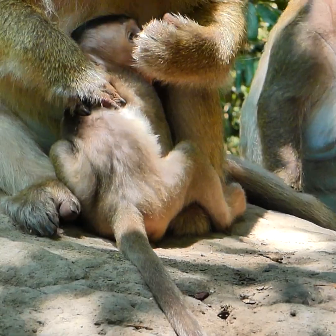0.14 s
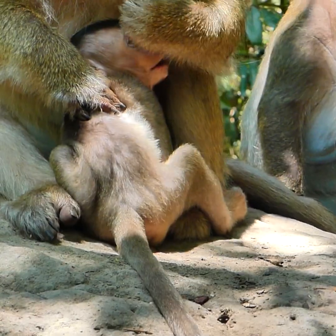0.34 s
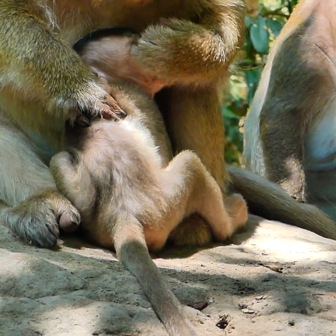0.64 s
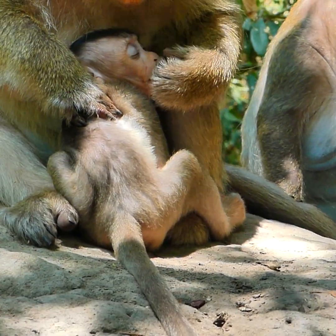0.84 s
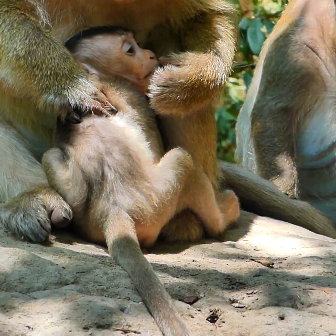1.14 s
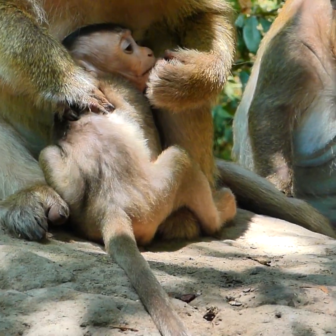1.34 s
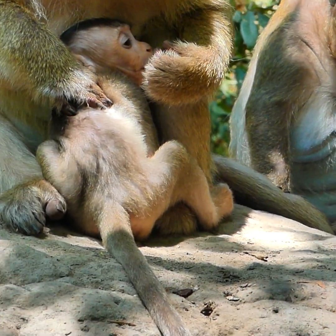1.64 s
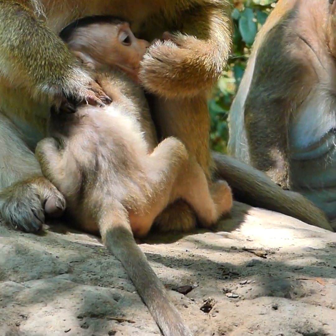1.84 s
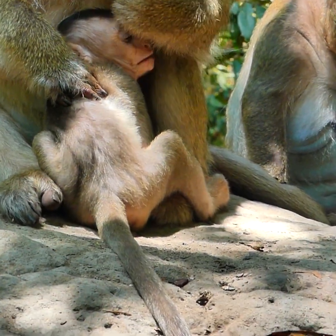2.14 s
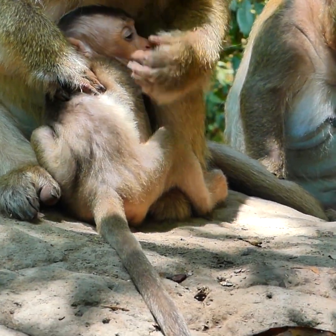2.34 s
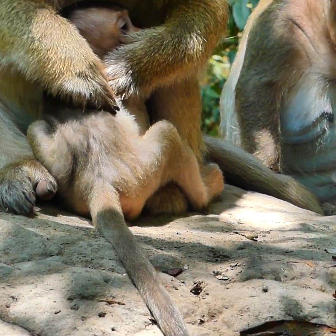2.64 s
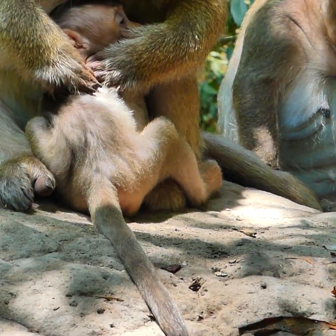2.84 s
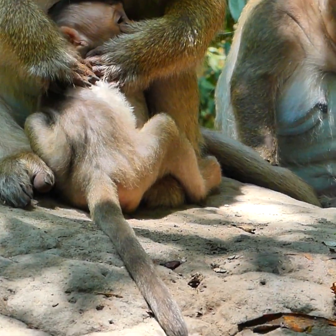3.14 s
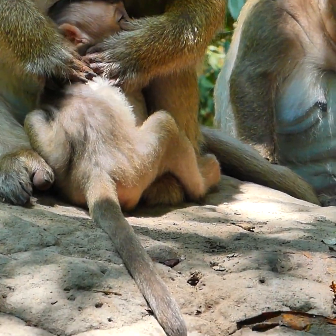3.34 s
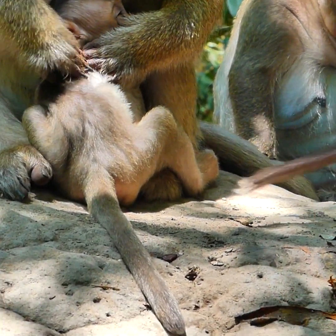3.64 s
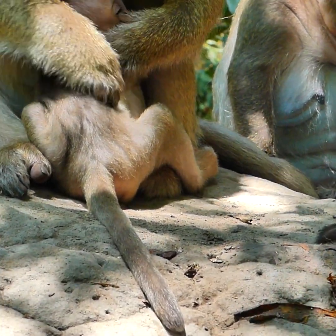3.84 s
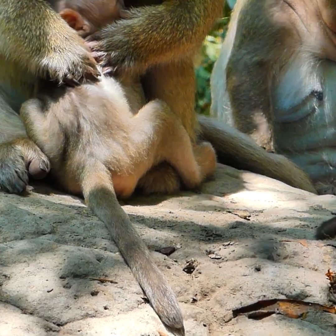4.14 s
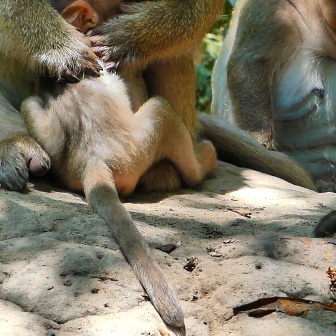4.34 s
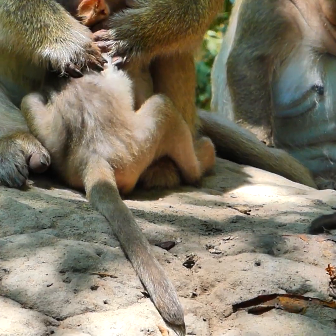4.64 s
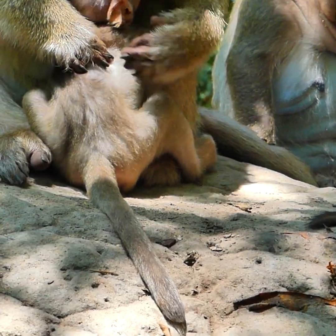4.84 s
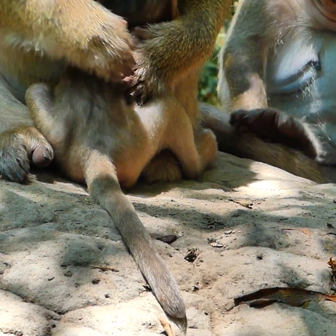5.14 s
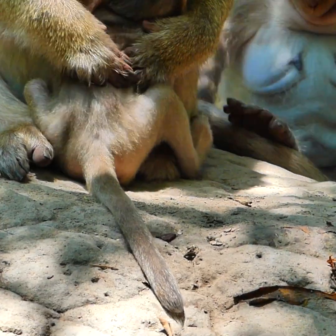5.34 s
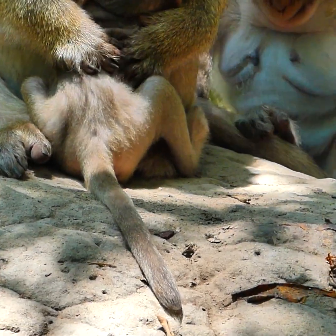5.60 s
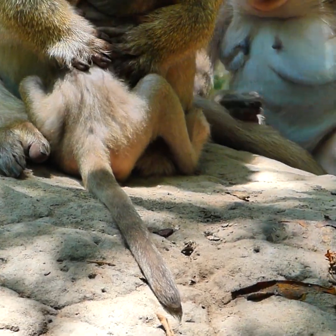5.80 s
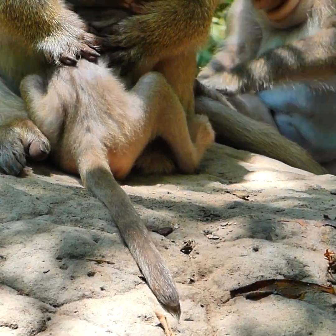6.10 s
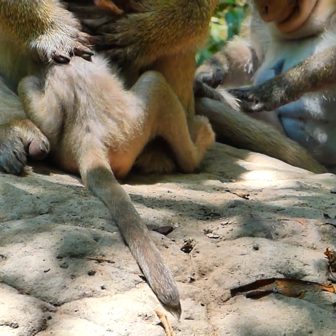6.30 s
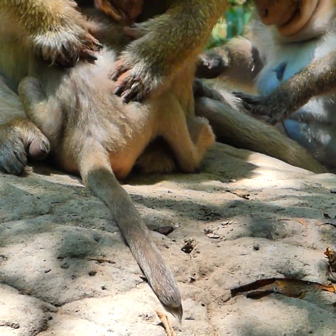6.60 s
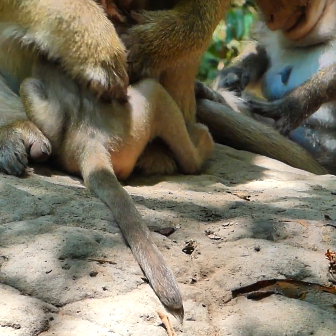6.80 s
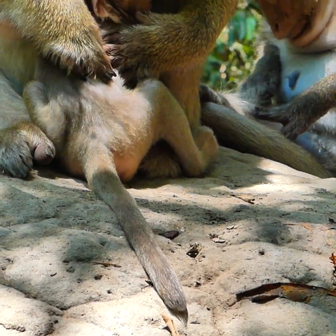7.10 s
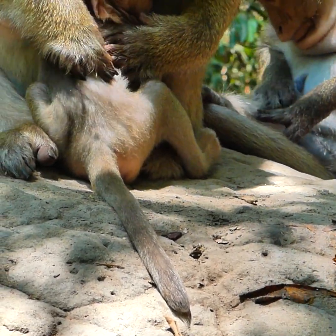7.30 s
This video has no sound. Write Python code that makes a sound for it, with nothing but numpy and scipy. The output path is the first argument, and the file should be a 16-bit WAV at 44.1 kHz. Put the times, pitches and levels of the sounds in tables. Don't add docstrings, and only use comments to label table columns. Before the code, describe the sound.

Soft, falling monkey coos turn to shrill cries in a breezy forest, while cicadas buzz, birds chip in pairs and leaves crackle.

```python
import sys
import numpy as np
from scipy import signal
from scipy.io import wavfile
from scipy.ndimage import uniform_filter1d

SR = 44100
rng = np.random.default_rng(int(sys.argv[2]) if len(sys.argv) > 2 else 0)


def waveform_to_disk(signal):
    frames = np.transpose(np.atleast_2d(signal))
    scaled = np.clip(frames, -1, 1) * 32767
    samples = np.round(scaled).astype(np.int16)
    wavfile.write(sys.argv[1], SR, samples)


def rack_gain(trim_db):
    fader = np.asarray(trim_db, float)
    return 10 ** (fader / 20)


N = 328986
T = np.arange(N) / SR


def evened(x):
    return x / np.sqrt(np.mean(x ** 2) + 1e-20)


def drift(shape, samples):
    return evened(uniform_filter1d(rng.standard_normal(shape), samples))


def smooth_drift(shape, samples):
    once = uniform_filter1d(rng.standard_normal(shape), samples)
    return evened(uniform_filter1d(once, samples))


def spectral_patches(frames, bins, over_bins, over_frames):
    across = uniform_filter1d(rng.standard_normal((frames, bins)).T, over_bins, 0)
    return evened(uniform_filter1d(across, over_frames, 1))


def read(points, hz):
    f, value = np.transpose(points)
    return np.interp(np.log(hz + 1), np.log(f + 1), value)


def curves(rows, fade_s=0.0033):
    s, *columns = np.transpose(rows)
    window = np.clip(np.minimum(T - s[0], s[-1] - T) / fade_s, 0, 1)
    return [np.interp(T, s, c) for c in columns], window


def resonate(x, hz, width_hz):
    turn = np.exp(2j * np.pi * np.cumsum(hz * np.ones(N)) / SR)
    r = np.exp(-np.pi * width_hz / SR)
    return 2 * (turn * signal.lfilter([(1 - r) ** 2], [1, -2 * r, r * r], x / turn)).real


def noise(db, same, lean_db, size=512):
    a, b, c, d = rng.standard_normal((db.shape[1], db.shape[0], 4)).T
    left, right = rack_gain(lean_db / 2), rack_gain(-lean_db / 2)
    shared, own = a + 1j * b, c + 1j * d
    z = np.array([left * shared, right * (same * shared + np.sqrt(1 - same ** 2) * own)])
    z *= rack_gain(db) * 2 / np.sqrt(left ** 2 + right ** 2 + 2 * same * left * right)
    return signal.istft(z, nperseg=size, noverlap=3 * size // 4)[1][:, :N]


def forest(x, t60_s):
    t = np.arange(SR // 2) / SR
    signs = rng.choice([-1., 1.], (2, len(t)))
    taps = signs * (rng.random((2, len(t))) < .06) * rack_gain(-60 * t / t60_s) * (t > .004)
    return signal.fftconvolve(x[None], taps / np.linalg.norm(taps[0]), axes=1)[:, :N]


def air():
    # (f/Hz, density/dB)
    air_points = [(15, -76), (25, -50), (123, 4), (242, -8.5), (363, -15), (405, -12.5), (531, -16),
                  (575, -17), (1610, -26), (1840, -24.5), (3300, -29), (4300, -29.5), (5730, -22.5),
                  (6560, -25), (7550, -27), (9500, -24), (11000, -24.5), (12500, -30.5), (16000, -30.5)]
    # (f/Hz, correlation)
    same_points = [(60, -0.24), (130, -0.086), (290, -0.84), (640, -0.72), (1410, -0.54), (3100, 0.018),
                   (6820, 0.25), (15000, 0.24)]
    # (f/Hz, level/dB)
    lean_points = [(60, -43), (180, -2.5), (550, -1.5), (1650, -1), (4970, -1.5), (15000, 1)]
    hz = np.fft.rfftfreq(1024, 1 / SR)[:, None]
    patches_db = 1.6 * spectral_patches(N // 256 + 5, 513, 10, 12)
    same = np.clip(read(same_points, hz), -.9, .9)
    x = noise(read(air_points, hz) + patches_db, same, read(lean_points, hz), size=1024)
    return rack_gain(-60) * x / np.std(x.mean(0))


def chorus():
    # (f/Hz, width/Hz, level/dB)
    insect_bands = [(5654, 590, -70), (8560, 670, -73.5), (10840, 470, -78.5)]
    near, apart = rng.standard_normal(N), rng.standard_normal((2, N))
    return sum(rack_gain(db) * evened(resonate(near + 0.2 * apart, hz, width_hz))
               for hz, width_hz, db in insect_bands)


def cicada(swell, throb, hz, width_hz, rise_hz, clicks_hz, depth_db, blur):
    start, end, full_db, below_db, swell_s = swell
    first_turn, throbs_hz, tires_s = throb
    skirt_hz, skirt_db = 340, -5
    db = full_db - below_db * np.exp(-(T - start).clip(0) / swell_s)
    gate = np.clip(np.minimum(T - start, end - T) / .15, 0, 1)
    tiring = .6 * (T - tires_s).clip(0) ** 2
    turn = 2 * np.pi * (first_turn + throbs_hz * T - tiring)
    count = np.cumsum(clicks_hz * (1 + 0.018 * drift(N, 900))) / SR
    clicks = sum(size * np.diff(np.floor(count + at), prepend=0).clip(0, 1)
                 for at, size in [(0, 1), (.31, .8), (.63, 1)])
    drive = evened(clicks) + blur * rng.standard_normal(N)
    skirt = rack_gain(skirt_db - np.interp(T, [2.85, 3.1], [0, 18]))
    belly = resonate(drive, hz + rise_hz * np.sin(turn), width_hz)
    buzz = evened(belly + skirt * resonate(drive, hz - skirt_hz, width_hz))
    depth_db = depth_db * np.interp(T, [2.8, 3.1], [.8, 1])
    x = rack_gain(db + depth_db * (np.cos(turn) - .2 * np.cos(2 * turn))) * gate * buzz
    return x + rack_gain(-11.5) * forest(x, 0.16)


def bird(chips, pitch, echo_db):
    # (start/ms, length/ms, from/Hz, to/Hz, level/dB)
    trill = [
        (-.4, 5.4, 5000, 7800, 1),
        (5, 6, 4700, 7400, 1.5),
        (10.8, 5, 7800, 5300, 5),
        (15.4, 4.4, 6000, 7300, 2.5),
        (18.4, 4, 7150, 7450, 4),
        (19.6, 3.4, 8000, 9200, -9),
    ]
    glide_ms, rise_ms, fade_db_per_ms = .65, 1.1, 2.6
    out, t_ms = np.zeros(N + SR), np.arange(-1, 26, 1000 / SR)
    for (s, peak_db), (tune, pace) in zip(chips, rng.standard_normal((len(chips), 2))):
        early = s < 5
        at_ms = t_ms * (1 + .02 * pace + .1 * early)
        start = round((s - .001) * SR)
        for ms, length_ms, from_hz, to_hz, db in trill:
            u = (at_ms - ms).clip(0)
            slide_ms = glide_ms * (1 if to_hz > from_hz else 4)
            hz = (to_hz + (from_hz - to_hz) * np.exp(-u / slide_ms)) * pitch * (1 + 0.0173 * tune)
            phase = 2 * np.pi * np.cumsum(hz) / SR
            shy_db = -1.5 * early * (ms < 8)
            fade = np.clip(np.minimum(u, length_ms - u) / rise_ms, 0, 1)
            envelope = rack_gain(peak_db + db + shy_db - fade_db_per_ms * u) * fade
            grit = rack_gain(2.5 * drift(len(t_ms), 25))
            note = np.sin(phase) + rack_gain(-23.5) * np.sin(2 * phase)
            out[start:start + len(t_ms)] += envelope * grit * note
    return out[:N] + rack_gain(echo_db) * forest(out[:N], 0.15)


def rustle():
    # (peak t/s, level near 3.5 kHz/dB, rise per 20 dB/s, t60/s, brightness/dB)
    moves = [(0.137, -62, 0.011, 0.37, -12), (.76, -70, 0.22, 1.5, -37), (1.008, -64.5, .008, 0.29, -43),
             (1.106, -56.5, .008, 0.57, -25), (1.275, -59, .008, 0.051, -41),
             (.375, -66.5, 0.011, 0.39, -14), (.465, -68.5, 0.011, 0.17, -30),
             (.555, -67.5, .01, 0.36, -25), (1.6, -74, 0.44, 3.5, -13), (1.95, -68.5, .1, .5, -28),
             (3.6, -68, .01, 0.22, -18), (3.75, -68.5, .01, 0.49, -18), (3.9, -70, .03, 0.37, -10),
             (5.95, -68, 0.031, 0.3, -41), (6.3, -69, .03, 0.61, -28), (6.82, -54.5, .05, .8, -25),
             (7.0, -54, 0.048, .8, -11), (4.3, -67.5, 0.055, 0.94, -27), (4.503, -63.5, 0.02, 0.68, -6),
             (4.69, -66, .05, 1.3, -29), (4.791, -69.5, 0.086, 0.29, -10), (5.04, -70, 0.038, 0.4, 10),
             (6.517, -55, 0.008, 0.66, -15), (6.559, -59, 0.081, 1.1, -14.5),
             (6.666, -58.5, 0.031, 0.61, -8), (6.73, -50.5, 0.031, 1.3, -23), (6.784, -56, 0.14, 0.45, -13),
             (6.86, -52.5, 0.14, 1.26, -25), (6.95, -53, 0.2, 0.64, -7), (7.06, -60.5, 0.11, 0.98, -2),
             (7.127, -43.5, 0.072, 0.16, -15.5), (7.15, -48.5, .05, 0.3, -20)]
    t = np.arange(N // 64 + 5) * 64 / SR
    hz = np.fft.rfftfreq(256, 1 / SR)[:, None]
    common_db = read([(300, -59), (700, -4.0), (3000, 0.5), (4000, 3.0), (5200, 1), (6500, 9.5),
                      (11500, 4.5), (12500, -71), (16000, -30)], hz)
    body = read([(1900, 0.72), (3300, 0.16)], hz)
    bright = read([(4500, 0.017), (10500, 0.45)], hz)
    presence = read([(4500, 0.013), (6300, 0.8), (10500, 0.03)], hz)
    field = np.full((129, len(t)), -140.)
    for s, db, rise_s, t60_s, treble_db in moves:
        shape_db = common_db - 12 * body + bright * treble_db + presence * (1.5 + 0.16 * treble_db)
        fall_db = np.where(t < s, 20 * (s - t) / rise_s, 60 * (t - s) / t60_s)
        field = np.maximum(db + shape_db - fall_db, field)
    flicker_db = 2.8 * rng.standard_normal(len(t))
    patches_db = 2.5 * spectral_patches(len(t), 129, 5, 14)
    return rack_gain(-11.5) * noise(field + flicker_db + patches_db, 0.033, -0.86, size=256)


def ticks():
    # (t/s, level/dB, ring f/Hz, width/Hz)
    leaf_ticks = [
        (3.4287, -49.5, 5600, 2200),
        (3.4886, -57, 4630, 900),
        (3.491, -52.5, 2310, 500),
        (6.932, -38, 8030, 4000),
        (7.107, -34, 6030, 5000),
        (7.1239, -32, 3940, 2587),
        (1.1065, -43, 4360, 1400),
    ]
    t60_s = 0.027
    out, t = np.zeros((2, N)), np.arange(0, .06, 1 / SR)
    for s, db, hz, width_hz in leaf_ticks:
        ring = signal.butter(2, [max(hz - width_hz / 2, 200), hz + width_hz / 2], "bandpass", fs=SR)
        puff = rng.standard_normal(len(t)) + 2.5 * rng.standard_normal((2, len(t)))
        crack = rack_gain(db - 60 * t / t60_s) * evened(signal.lfilter(*ring, puff))
        out[:, round(s * SR):][:, :len(t)] += crack
    return out


def twig():
    # (t/s, peak/dB)
    snap_s, snap_db = (6.4885, -28)
    # (f/Hz, level/dB, t60/s)
    twig_modes = [(2695, -23, .02), (4130, 3.5, 0.016), (5230, -7, 0.034), (6780, 0.5, 0.016),
                  (8000, -3, 0.021), (9500, -5.5, 0.013), (11500, -11, .01)]
    t = (T - snap_s).clip(0)
    modes = sum(rack_gain(db - 60 * t / t60_s) * np.sin(2 * np.pi * hz * t) for hz, db, t60_s in twig_modes)
    crack = modes * np.clip(t / 0.0009, 0, 1)
    crack = rack_gain(snap_db) * (crack + 0.29 * np.roll(crack, 240))
    return crack + rack_gain(-4.0) * forest(crack, 0.11)


def bumps():
    # (t/s, level/dB, ring f/Hz, width/Hz, t60/s)
    ringing_puffs = [(1.11, -56.5, 317, 150, 0.36), (1.32, -54.5, 169.7, 152, 0.27),
                     (1.33, -55.5, 430, 295, 0.37), (1.416, -56.5, 610, 130, 0.21),
                     (1.47, -54.5, 670, 202.4, 0.13), (3.881, -52.5, 570, 785, 0.51),
                     (.53, -67, 1730, 260, 1.2), (4.507, -56, 670, 150, .13), (4.603, -57, 820, 250, .07),
                     (4.685, -63, 650, 250, 1.3), (4.762, -59, 770, 450, .3), (4.79, -59, 790, 420, .3),
                     (4.735, -67, 1450, 500, .6), (4.499, -56.5, 2400, 2800, .5), (4.5, -62, 4300, 400, .3),
                     (4.5, -61, 3300, 500, .3), (4.52, -67, 2450, 500, .8), (4.79, -67, 4400, 500, .8),
                     (5.06, -60, 1700, 1100, .4), (5.085, -58, 2000, 1200, .22), (5.04, -64, 930, 400, .55),
                     (1.862, -59, 930, 480, .3), (1.915, -66, 1290, 130, .4), (1.905, -67, 1860, 250, .3),
                     (2.88, -65, 2100, 1400, .6), (3.325, -60.5, 2570, 500, 0.16), (6.85, -57, 1400, 250, .15),
                     (.2, -60, 2100, 500, .4), (.25, -63, 2500, 200, .15), (1.108, -61, 1520, 330, .7),
                     (1.262, -65, 1500, 500, .25), (1.33, -65, 1500, 900, .6), (6.72, -60, 1350, 300, .5),
                     (1.105, -57, 4400, 1500, .55), (1.105, -63, 2500, 500, .4), (.648, -58, 1200, 320, .4),
                     (.742, -61, 1170, 220, .4), (.745, -62, 2200, 220, .4), (.92, -61, 1750, 650, .8),
                     (1.012, -58, 1300, 260, .2)]
    # (t/s, peak/dB, f/Hz, length/s)
    knocks = [
        (4.4963, -47, 676, 0.023),
        (4.7505, -46, 770, 0.0096),
    ]
    out = np.zeros((2, N))
    puff = rng.standard_normal(N) + 2.2 * rng.standard_normal((2, N))
    for s, db, hz, width_hz, t60_s in ringing_puffs:
        t = (T - s).clip(0)
        envelope = rack_gain(db - 60 * t / t60_s) * np.clip(t / 0.0015, 0, 1)
        out += envelope * evened(resonate(puff, hz, width_hz))
    for s, db, hz, length_s in knocks:
        u = np.clip((T - s) / length_s, 0, 1)
        out += rack_gain(db) * np.sin(np.pi * u ** 0.44) * np.sin(2 * np.pi * hz * (T - s))
    return out


def panting():
    # (t/s, level/dB, mouth opening 0-1)
    breath_rows = [
        (0.635, -75, 0),
        (0.65, -61, 0),
        (0.72, -64.5, 0.18),
        (.8, -66.5, 0.22),
        (0.86, -65, 0.26),
        (0.96, -59.5, 0.66),
        (1.04, -62.5, 0.62),
        (1.116, -65, 0.85),
        (1.22, -78, 1),
    ]
    # (f/Hz, width/Hz, shift at full opening/Hz)
    throat_rings = [(1207, 260, 170), (1864, 300, -350), (2245, 290, -420), (2740, 290, 20)]
    # (t/s, lift/dB)
    gasps = [
        (.648, 3),
        (0.743, 9),
        (.795, 2.5),
        (.925, 1),
        (.965, 0),
        (1.012, 6),
        (1.075, 2.5),
        (1.108, -2),
    ]
    gasp_fade_s = 0.026
    (db, mouth), gate = curves(breath_rows)
    for s, lift_db in gasps:
        db = db + lift_db * np.exp(-(T - s).clip(0) / gasp_fade_s) * np.clip((T - s) / .003, 0, 1)
    turns = np.cumsum(78 * (1 + 0.23 * drift(N, 500))) / SR
    puffs = (0.7 + np.exp(-(turns % 1) / 0.3)) * rng.standard_normal((2, N))
    patchy = rack_gain(1.2 * smooth_drift((4, N), 900))
    rings = []
    for (hz, width_hz, shift_hz), patch in zip(throat_rings, patchy):
        ring_hz = (hz + shift_hz * mouth) * (1 + 0.086 * np.log(patch))
        rings.append(evened(resonate(puffs, ring_hz, width_hz)) * patch)
    half_open = np.sin(np.pi * mouth)
    throat = rings[0] + rack_gain(-5.5 + 11.4 * mouth) * rings[1]
    throat = throat + rack_gain(-4 + 4.2 * half_open) * rings[2] + rack_gain(-18.0 + 11.0 * half_open) * rings[3]
    return rack_gain(db + 2.0) * gate * throat


def voiced(hz, levels_db, gate):
    # (t/s, lead of the left port/ms)
    head_lead = [(0.15, -0.083), (0.39, -0.21), (1.48, -0.039), (1.77, -0.2), (2.14, 0.18), (2.81, -0.42),
                 (3.01, 0.34), (3.42, -0.15), (3.96, -0.18), (4.96, -0.17), (5.08, -0.14), (6.59, -0.56),
                 (6.91, 0.1), (7.04, -0.37), (7.12, 0.43), (7.4, 0.24)]
    wobble = 1 + 0.00582 * drift(N, 300)
    on, out = gate > 0, np.zeros((2, N))
    phase = 2 * np.pi * np.cumsum(hz * wobble)[on] / SR
    lead = (hz * curves(head_lead)[0][0])[on] / 1000
    for k, db in levels_db.items():
        side = np.clip(np.tan(np.pi * k * lead), -2.5, 2.5) * np.cos(k * phase)
        ports = np.sin(k * phase) + np.array([side, -side])
        out[:, on] += np.sqrt(2) * rack_gain(db[on]) * gate[on] * ports
    return out


def grunts(flutter_db):
    # (t/s, peak/dB, pitch/Hz, length/s, second harmonic/dB)
    grunt_rows = [
        (2.924, -59, 1011, 0.022, -23),
        (3.339, -52.5, 912, 0.032, -14),
        (3.916, -55.5, 557, 0.094, -22),
        (4.01, -61.5, 537, 0.053, -21),
        (5.829, -54, 285.5, 0.035, -36),
        (6.176, -61, 533, 0.061, -38),
        (6.302, -53.5, 658, 0.059, -29),
    ]
    hz, db, second_db, gate = np.zeros((4, N))
    for s, peak_db, pitch_hz, length_s, second in grunt_rows:
        on = (T > s) & (T < s + length_s)
        u = (T[on] - s) / length_s
        hz[on] = pitch_hz * (1.02 - 0.0384 * u)
        db[on], second_db[on] = peak_db, second
        gate[on] = np.sin(np.pi * u ** 0.43)
    db = db + 2.55 * flutter_db
    return voiced(hz, {1: db, 2: db + second_db, 3: db + second_db}, gate)


def syllable(start, length_s, db, hz, mouth_db):
    attack_s, release_s, edge_db, sag_db = .017, 0.013, -22, -1.5
    sag_hz_per_s, scoop_hz = 130, 15.1
    hold_end = max(length_s - release_s, attack_s + .001)
    s = start + np.array([0, attack_s, hold_end, max(length_s, attack_s + .002)])
    pitch = hz - sag_hz_per_s * (s - start) + scoop_hz * (s == start)
    return np.transpose([s, pitch, db + np.array([edge_db, 0, sag_db, edge_db]), mouth_db + 0 * s])


def monkey():
    # (t/s, pitch/Hz, effort/dB, mouth opening as overtone lift/dB)
    coos = [
        [(0, 983, -58.5, 13.5), (.056, 1016, -64, 2), (.14, 1068, -49, 6), (.205, 1046, -54, 11.5),
         (.235, 1027, -46.5, 6.5), (.31, 993, -42, -9), (.4, 942.5, -39.5, -2), (.455, 936, -42.5, -9),
         (.495, 933, -62.5, 16)],
        [(1.362, 925, -63, 10), (1.372, 898, -47.5, 7), (1.43, 946, -45.5, 6.5), (1.49, 960, -42, 3),
         (1.59, 956.5, -41, -1), (1.65, 937.5, -39, -3), (1.73, 915.5, -40.5, 0), (1.815, 904, -41, -3.5),
         (1.854, 920, -54, 9)],
        [(4.904, 933, -53, -43), (4.917, 927, -51, -22), (4.935, 921, -37, -12), (4.952, 935, -39, -8),
         (4.968, 993, -35.5, -14), (4.976, 982, -46.5, -16), (4.997, 993, -55, -12), (5.013, 1010, -74, -8)],
    ]
    last_coo = [
        (6.505, 827.1, -77, 4),
        (6.523, 845, -54.5, 4),
        (6.539, 937, -47, 3),
        (6.561, 935, -43, 4),
        (6.603, 928, -50.5, 3),
        (6.643, 922, -49.5, 7),
        (6.651, 960, -46.5, 4),
        (6.67, 992, -79, 4),
    ]
    cries = [
        [(2.712, 843, -70, 3), (2.73, 854, -53.5, 4), (2.765, 885, -51, 5.5), (2.79, 853, -58.5, 7),
         (2.848, 807, -62.5, 5), (2.865, 852, -55.5, 2), (2.89, 859, -54, -1), (2.906, 830, -66, -6)],
        [(2.907, 800, -72, -12), (2.925, 731, -58, -16), (2.95, 583, -56.5, -18), (3.005, 470, -57, -18),
         (3.05, 494.4, -70, -0.5), (3.12, 521, -69.5, -1), (3.15, 528, -73, -12)],
        [(3.328, 699, -60, -5), (3.36, 735, -45.5, 1), (3.43, 737, -47.5, 1), (3.452, 722, -61, 2),
         (3.485, 700, -70.5, -1), (3.52, 678, -71, -6)],
        [(5.028, 938, -68, -20), (5.055, 849, -62, 6), (5.068, 817, -62, 13), (5.097, 764, -63, 20.5),
         (5.118, 650, -60, -12), (5.135, 545, -65, 6), (5.18, 470, -82, 10)],
        [(7.366, 1075, -67, -30), (7.382, 1030, -37.5, -24), (7.405, 991, -32.5, -22), (7.47, 964, -35.5, -26)],
    ]
    shrieks = [
        [(6.855, 1106, -63, 3), (6.877, 1106, -35, -4.5), (6.909, 1117, -35, -5), (6.927, 1095, -35, -4),
         (6.937, 1111, -45, 4), (6.949, 1120, -54, 8), (6.959, 1167, -46, -12), (6.975, 1214, -53, -8),
         (6.99, 1130, -43, -3)],
        [(6.991, 1128, -50.5, -3), (7.002, 1120, -37, -11), (7.015, 1085, -40, -6), (7.046, 1093, -41, -2.5),
         (7.086, 1067, -54.5, 10), (7.098, 1039, -38.5, 1), (7.13, 1046, -43, -1), (7.16, 975, -68, 0),
         (7.2, 1055, -68, -10)],
    ]
    # (start t/s, length/s, effort/dB, pitch/Hz, mouth opening/dB)
    hoots = [
        (2.015, 0.235, -69.5, 866, -4),
        (6.679, .05, -63, 973, -3),
    ]
    # (f/Hz, level/dB)
    closed = [(1100, -28), (1820, -36.5), (1910, -22.5), (2000, -7), (2100, -16.5), (2600, -40),
              (3500, -65), (9000, -90)]
    opened = [(1000, 5.5), (1450, -26.5), (1590, -10.5), (1750, -18), (2180, -22), (2550, -14), (3400, -58),
              (9000, -67)]
    shrill = [(2080, -21), (2230, -13), (3300, -48), (5500, -48), (6650, -3.5), (7750, -19), (8680, -12),
              (9500, -45)]

    calls = [(np.array(rows), closed) for rows in list(coos) + [last_coo]]
    calls += [(np.array(rows), opened) for rows in cries]
    calls += [(syllable(*row), closed) for row in hoots]
    calls += [(np.array(rows), shrill) for rows in shrieks]
    every = np.concatenate([rows for rows, _ in calls])
    (hz, first_db, mouth_db), _ = curves(every[np.argsort(every[:, 0])])
    sounding, overtones_db = np.zeros(N), np.full((7, N), -90.)
    for rows, throat in calls:
        on = (T > rows[0][0] - .006) & (T < rows[-1][0] + .006)
        sounding[on] = 1
        overtones_db[:, on] = read(throat, np.arange(2, 9)[:, None] * hz[on])
    flutter_db = smooth_drift((3, N), 300)
    gate = uniform_filter1d(sounding, 300, mode="nearest")
    shaky = .4 + .18 * np.clip(-46 - first_db, 0, 20)

    breath = rack_gain(first_db - 25.5) * gate * evened(resonate(rng.standard_normal((2, N)), hz, 290))
    high_breath = evened(resonate(rng.standard_normal((2, N)), 2 * hz, 970))
    breath += rack_gain(first_db - 27 + mouth_db) * gate * high_breath

    rasp_db = 1.1 * shaky * smooth_drift((2, N), 90)
    levels_db = {1: first_db + shaky * flutter_db[0]}
    for k, db in enumerate(overtones_db):
        levels_db[k + 2] = first_db + mouth_db + db + 1.6 * flutter_db[1 + k % 2] + rasp_db[k % 2]
    out = breath + voiced(hz, levels_db, gate)
    out += grunts(flutter_db[1])
    return out + rack_gain(-22) * forest(out[0], .15)


def scene():
    # (start t/s, end t/s, full/dB, start below full/dB, swell/s)
    low_swell = (.3, 5.0, -60, 11, 1.3)
    high_swell = (2.0, 5.27, -63.5, 18, 1.0)
    # (first turn, rate/Hz, tires from t/s)
    low_throb = (.27, 7.88, 3.9)
    high_throb = (-.5, 8.155, 4.4)
    # (t/s, peak/dB)
    near_chips = [(0.367, -44), (.544, -42), (1.4192, -42), (1.6305, -41.5), (2.62, -41.5), (2.82, -39),
                  (3.4949, -39), (3.6958, -40), (4.393, -38), (4.5866, -40), (5.2464, -39.5),
                  (5.449, -38.5), (6.254, -38.5), (6.4673, -34.5), (7.2375, -41.5), (7.439, -39)]
    far_chips = [
        (.688, -54),
        (.855, -55.5),
        (1.025, -54.5),
    ]
    low = cicada(low_swell, low_throb, hz=8700, width_hz=520, rise_hz=-90, clicks_hz=118,
                 depth_db=4.6, blur=0.9)
    high = cicada(high_swell, high_throb, hz=9190, width_hz=270, rise_hz=-40, clicks_hz=124,
                  depth_db=7.5, blur=0.9)
    birds = bird(near_chips, pitch=0.99, echo_db=-3.0) + bird(far_chips, pitch=.79, echo_db=1.5)
    background = air() + chorus() + low + high
    animals = monkey() + panting() + birds
    return background + animals + rustle() + twig() + bumps() + ticks()


def top_cut(x):
    return signal.sosfilt(signal.butter(12, 16470, fs=SR, output="sos"), x)


def record(dry):
    mix = signal.sosfilt(signal.butter(1, 60, "highpass", fs=SR, output="sos"), dry)
    return top_cut(mix)


dry = scene()
out = record(dry)
waveform_to_disk(out)
```